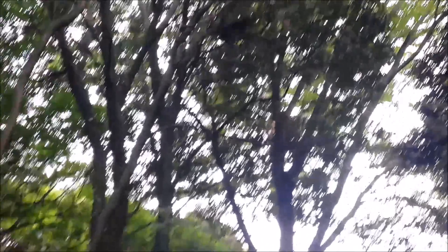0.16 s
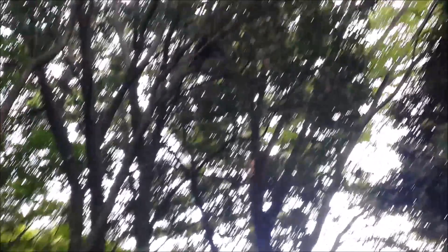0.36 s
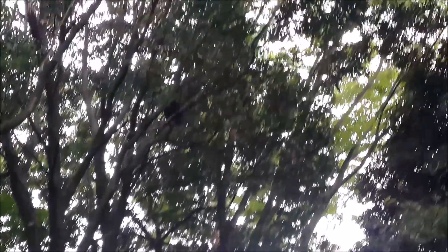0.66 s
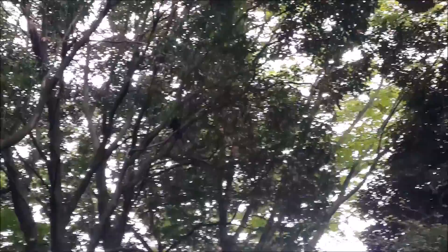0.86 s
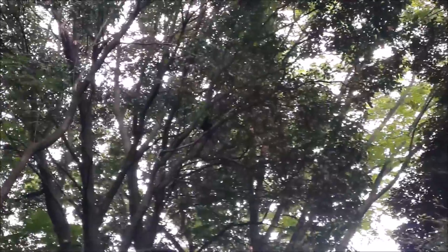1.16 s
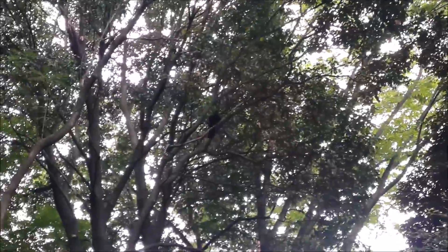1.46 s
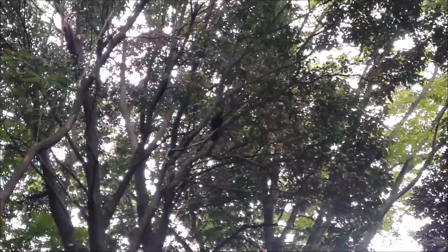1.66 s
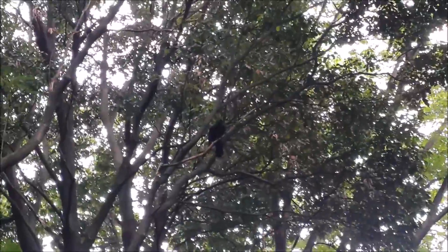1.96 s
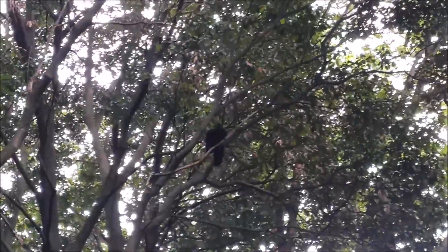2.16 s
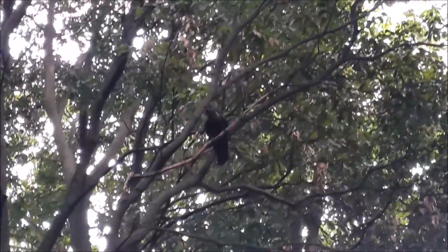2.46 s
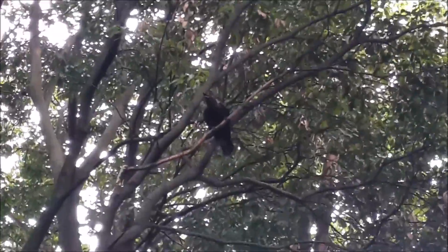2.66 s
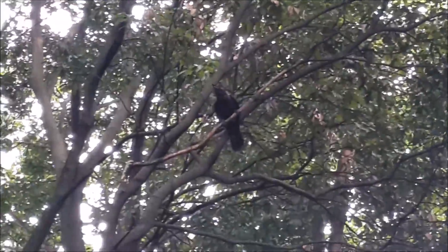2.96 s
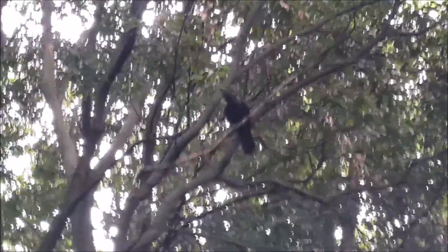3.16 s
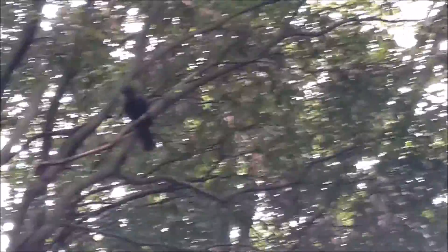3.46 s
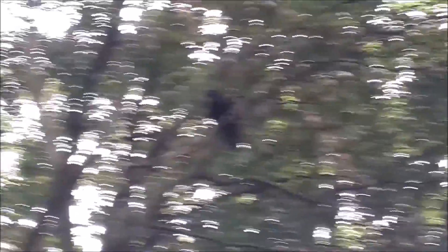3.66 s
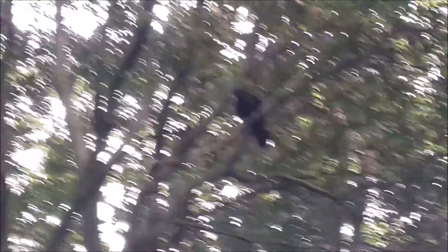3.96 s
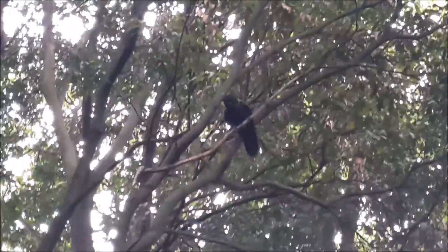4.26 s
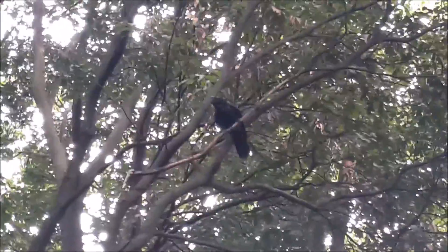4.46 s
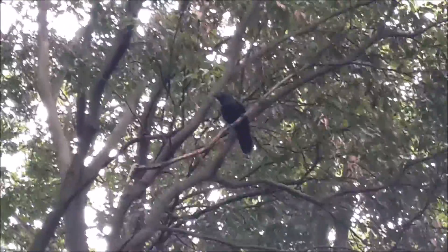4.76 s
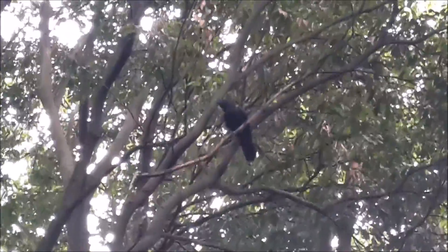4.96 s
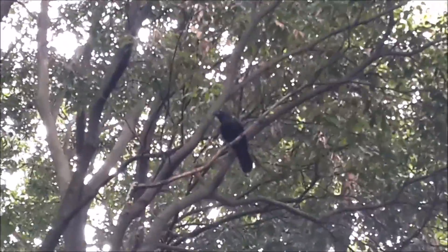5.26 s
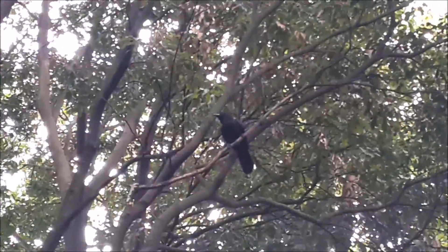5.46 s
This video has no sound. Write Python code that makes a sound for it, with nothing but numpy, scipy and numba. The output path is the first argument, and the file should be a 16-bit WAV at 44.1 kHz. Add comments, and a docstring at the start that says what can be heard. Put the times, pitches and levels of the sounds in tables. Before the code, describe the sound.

A phone microphone under trees picks up one distant caw, three strong crow caws, a clipped snippet of another cut by a momentary dropout, a small pop, sharp crackles at the left, then two more caws. Each caw rises quickly and ends in a rasp, with diffuse echoes from trunks and leaves. Low traffic hum, soft hiss and very high, faint falling bird whistles lie underneath.

```python
"""A faint, distant caw comes first, over town hum and leaf hiss that fade up; then a crow caws five times nearby.
Each caw is a train of syrinx pulses that rings in throat, beak and windpipe: its pitch arches, then it rasps.
Trunks, leaves and far trees scatter it as decaying noise; a small bird's gliding sines draw thin falling whistles.
The phone drops out once, cutting a further caw short, and pops back; decaying sines crackle at its left port."""
import sys
import numpy as np
from scipy import signal
from scipy.fft import rfft, irfft
from scipy.io import wavfile
from scipy.ndimage import uniform_filter1d
from numba import njit

SR = 44100
rng = np.random.default_rng(int(sys.argv[2]) if len(sys.argv) > 2 else 0)


def pcm_store(signal):
    """Save signal as 16-bit PCM."""
    levels = np.round(np.clip(np.atleast_2d(signal), -1, 1) * 32767)
    wavfile.write(sys.argv[1], SR, levels.astype(np.int16).T)


N = 247356
T = np.arange(N) / SR

# background spectrum, before its bands are scaled: frequency_hz, relative density_db (per Hz)
TOWN_SPECTRUM = [(25, -18), (45, -13.5), (65, -6), (110, -4), (190, -4.5), (280, -4.5), (400, -6.5),
                 (700, -9.5), (1000, -11.5), (1400, -16.5), (2100, -16.5), (4000, -20.5), (6200, -19),
                 (8500, -26), (12000, -29), (15500, -31)]
# slow swell of the background: time_s, hum_db, leaf_hiss_db
BACKGROUND_SWELL = [(0, -52.5, -61), (1.3, -52.5, -62), (2, -50.5, -58.5), (3.1, -53, -60.5),
                    (4.4, -51, -58.5), (5.2, -56, -63)]
# low drones of far traffic: start_s, end_s, centre_hz, width_hz, level_db (relative to the hum)
TRAFFIC_DRONES = [(1.8, 3.2, 116, 12, -8), (2.5, 5.9, 142, 20, -8), (3.9, 5.6, 241, 39, -12.5),
                  (4.8, 5.9, 76, 17, -9)]
# crackles at the left port: time_s, nominal peak_db, ring_hz
PORT_CRACKLES = [(3.265, -25, 9700), (3.269, -16, 6700), (3.2799, -6, 2500), (3.2847, -2.5, 6000),
                 (3.2944, -6, 5700), (3.306, -7.5, 5970)]
# falling whistles, ever slower in their glide: start_s, end_s, start_hz, end_hz, level_db (rms before flutter)
BIRD_WHISTLES = [(0.378, 0.578, 8460, 7900, -77), (2.435, 2.645, 8770, 8117, -64.5),
                 (2.762, 3.914, 8570, 7520, -67), (4.075, 4.7, 8230, 7340, -64.5),
                 (4.989, 5.66, 8440, 7460, -68.5)]
# how the two microphone ports hear the crows: frequency_hz, left_minus_right_db, left_lead_rad
PORT_DIFFERENCE = [(300, 1.5, 0), (900, 2, -.2), (1400, 2.5, -.78), (2200, -1, -1.4), (3300, -4, .4),
                   (4700, -2, -.2), (5800, 2, 1.8), (8000, -2, -1)]
# fixed colour of the throat, before levelling: frequency_hz, relative gain_db
THROAT_COLOUR = [(150, -24), (250, -17), (330, -20), (450, -14), (600, -10), (800, -11), (930, -7),
                 (1040, -1.5), (1220, -1.5), (1470, 1), (1660, -4), (1800, -1), (2000, -8), (2150, -16),
                 (2350, -13), (2600, -26), (2900, -32), (4000, -42)]
# upper resonances of the windpipe, before levelling: frequency_hz, relative gain_db
WINDPIPE_COLOUR = [(1800, -15.5), (2800, 0), (3150, 8), (3500, 7.5), (3950, -0.5), (4500, 4.5),
                   (5000, -0.5), (5700, -7), (6800, -11), (7700, -9.5), (8900, -17), (10500, -14.5),
                   (13000, -23.5), (15500, -23)]
# caws; the first is far off, the fifth is cut short by the dropout:
# start_s, length_s, level_db, attack_s, loudness_db_per_octave (follows pitch), top_pitch_hz, rise_s,
# rise_steepness (power), break_s (after the start), crest_beak_hz (resonance at the top of the pitch),
# roughness before the break (0-1), treble_db, top_octave_db, echo_db
CROW_CAWS = [ (0.019, 0.36, -39, 0.068, 9.5, 297.5, 0.09, 1.95, 0.2, 1150, 0.5, -16.5, -26, 8.5),
             (0.545, 0.31, -22, 0.12, 15.5, 315.8, 0.093, 2.6, 0.23, 1210, 0.13, -19, -2, 6),
             (1.426, 0.38, -20.5, 0.094, 22.5, 301.2, 0.11, 1.45, 0.22, 1410, 0.1, -22.5, 1, 3.5),
             (2.078, 0.35, -22, 0.038, 17.5, 310.2, .110, 1.98, 0.22, 1330, 0.1, -21.5, 5.5, 3.5),
             (2.710, 0.083, -29, 0.069, 11, 255.4, 0.0435, 1.4, 0.092, 1160, 0.2, -51, -8, 10),
             (3.492, .405, -22, 0.076, 19, 297.7, .128, 1.55, .224, 1390, 0.16, -22, 1.5, 5),
             (4.182, .401, -21.5, 0.07, 23.5, 299.7, .120, 1.7, 0.23, 1400, 0.16, -23.5, 3.5, 5), ]
# silence of the input: mute_s, return_s
DROPOUT = (2.7385, 2.8173)

FADE_IN_S, FADE_IN_DB = 0.72, -14.5  # the background fades up from this level
HUM_FLICKER_DB = 1.2  # spread of the hum's slight wander
ONSET_HZ, END_HZ, SAG_POWER = 208.4, 188.2, 1.6  # pitch climbs to the top, then sags ever faster
BREAK_DB, BREAK_S = -4, .012  # the level dips briefly around the voice break
FLUTTER_DB = 2  # level flutter at full roughness
RASP_LEAD_S, RASP_GROW_S = .025, .12  # the rasp starts ahead of the break and is full after it
RELEASE_S = .035  # the voice stops over this time
BEAK_START_HZ, BEAK_BREAK_HZ, BEAK_END_HZ = 1150, 1340, 1220
BEAK_BREAK_SHARE = .55  # share of the way from the crest resonance to the break resonance
# the treble crests at a share of the caw
TREBLE_CREST, TREBLE_START_DB, TREBLE_END_DB = 0.49, -14, -15
HOLLOW_HZ, HOLLOW_WIDTH_HZ, HOLLOW_DB = 602, 100, -17  # throat resonance near the second harmonic
TOP_HZ = 15300


def undb(db):
    """Logarithmic level: decibels to amplitude gain."""
    return 10 ** (np.asarray(db) / 20)


def unit(x):
    """Normalisation: scale to rms 1."""
    return x / np.sqrt(np.mean(x ** 2))


def along(points, hz, column=1):
    """Interpolate a table along a log-frequency axis."""
    rows = np.array(points, float)
    return np.interp(np.log(hz + 1), np.log(rows[:, 0]), rows[:, column])


def colour(x, points, size=2048):
    """Minimum-phase filtering: folding the cepstrum makes a spectral outline causal."""
    cepstrum = irfft(np.log(undb(along(points, np.fft.rfftfreq(size, 1 / SR)))))
    cepstrum[1:size // 2] *= 2
    cepstrum[size // 2 + 1:] = 0
    impulse = irfft(np.exp(rfft(cepstrum)))
    return signal.fftconvolve(x, impulse)[:len(x)]


def filt(x, hz, kind, order=2):
    """Butterworth filtering: a maximally flat passband."""
    return signal.sosfilt(signal.butter(order, hz, kind, fs=SR, output="sos"), x)


def walk(rate):
    """Random modulation: levels held 1 / rate seconds and smoothed twice; rms 1."""
    hold = int(SR / rate)
    steps = np.repeat(rng.standard_normal(N // hold + 1), hold)
    smooth = uniform_filter1d(uniform_filter1d(steps, hold), hold)
    return unit(smooth[:N])


def steady(x, size=900):
    """Automatic levelling: divide by the moving rms, holding it near 1."""
    return x / np.sqrt(uniform_filter1d(x ** 2, size) + 1e-9)


def background(split_hz=1100, wide_hz=3500, bass_side=0.35):
    """Interchannel coherence: bass hum reaches both ports nearly alike, leaf hiss is wide."""
    swell_s, hum_db, hiss_db = np.transpose(BACKGROUND_SWELL)
    hum_level = undb(np.interp(T, swell_s, hum_db))
    hiss_level = undb(np.interp(T, swell_s, hiss_db))
    mid, side = (colour(rng.standard_normal(N), TOWN_SPECTRUM) for _ in range(2))
    # the side signal, which sets the ports apart, is weaker in the bass
    side = bass_side * side + (1 - bass_side) * filt(side, wide_hz, "high", order=1)
    air = np.array([mid + side, mid - side])
    hum = unit(filt(air, split_hz, "low", order=3)) * undb(HUM_FLICKER_DB * walk(9))
    # the hiss is scaled by its upper treble
    hiss = filt(air, split_hz, "high", order=3) / np.std(filt(mid, 5500, "high", order=4))
    for start, end, hz, width, db in TRAFFIC_DRONES:
        passing = np.clip(np.minimum(T - start, end - T) / 0.08, 0, 1)
        band = [hz - width / 2, hz + width / 2]
        drone = unit(filt(rng.standard_normal(N), band, "band"))
        hum = hum + undb(db) * passing * drone
    # the left port hears the background slightly louder
    return (hum * hum_level + hiss * hiss_level) * undb([[.6], [-.6]])


def crackles(ring_t60=0.0015, tail_db=-21, tail_t60=0.015, snap=0.14):
    """Impulse excitation: sharp ticks, as of a fingertip at the port, ring down with a short fizz."""
    out, t = np.zeros(N), T[:1024]
    for time_s, peak_db, hz in PORT_CRACKLES:
        tick = np.sin(2 * np.pi * hz * t) * np.exp(-np.log(1000) * t / ring_t60)
        tick[0] -= snap
        fizz = unit(filt(rng.standard_normal(len(t)), [3500, 8000], "band"))
        fizz = fizz * np.exp(-np.log(1000) * t / tail_t60)
        at = int(time_s * SR)
        out[at:at + len(t)] += undb(peak_db) * (tick + undb(tail_db) * fizz)
    return out


def whistles(bend_s=0.023, waver=0.00073, flutter_db=3.0):
    """Frequency modulation: a small bird's near-pure tone drops quickly, then levels out."""
    out = np.zeros(N)
    drift = 1 + waver * walk(37)
    flutter = undb(flutter_db * walk(25.13))
    for start, end, top_hz, end_hz, level_db in BIRD_WHISTLES:
        on = (T > start) & (T < end)
        fall = np.log1p((T[on] - start) / bend_s) / np.log1p((end - start) / bend_s)
        hz = (top_hz + (end_hz - top_hz) * fall) * drift[on]
        tone = np.sin(2 * np.pi * np.cumsum(hz) / SR)
        out[on] += undb(level_db) * tone * signal.windows.tukey(on.sum(), .05)
    return np.sqrt(2) * out * flutter  # sine peak from rms


def woods(x, trunks_db=-10, trunks_t60=0.087, leaves_db=-3, leaves_t60=1.0, leaves_hz=4400,
          far_db=-15.0, far_t60=1.11, far_low_hz=1000, far_high_hz=1580):
    """Diffuse scattering: near trunks answer briefly, leaves return treble, far trees a long, narrow tail."""
    t = T[:2 * SR]

    def scatter(t60):
        """Exponential decay: noise falls 60 dB in t60 seconds, independently at each port."""
        echo = rng.standard_normal((2, len(t))) * undb(-60 * t / t60) * (1 - np.exp(-t / .006))
        return echo / np.sqrt(np.sum(echo ** 2) / 2)

    trunks = undb(trunks_db) * scatter(trunks_t60)
    leaves = undb(leaves_db) * filt(scatter(leaves_t60), leaves_hz, "high", order=4)
    far = undb(far_db) * filt(scatter(far_t60), [far_low_hz, far_high_hz], "band", order=1)
    return signal.fftconvolve(x[None], trunks + leaves + far, axes=1)[:, :N]


def branches(x, db=-3, above_hz=2000, spread_s=.012):
    """Early reflection: twigs and leaves at the perch return upper overtones, differently to each port."""
    echo = rng.standard_normal((2, int(spread_s * SR)))
    echo = filt(echo / np.sqrt(echo.shape[1]), above_hz, "high")
    return undb(db) * signal.fftconvolve(x[None], echo, axes=1)[:, :N]


def ports(x):
    """Diffraction: the phone's body shades and delays the sound differently at its two ports."""
    hz = np.fft.rfftfreq(N, 1 / SR)
    # each port takes half the difference, in opposite directions
    gain = undb(along(PORT_DIFFERENCE, hz) / 2)
    half = gain * np.exp(.5j * along(PORT_DIFFERENCE, hz, column=2))
    return irfft(rfft(x) * np.array([half, 1 / half]), N)


@njit
def resonance(x, hz, width):
    """Time-varying resonance: a state-variable band-pass with moving centre and width; gain 1 at the centre."""
    y, band, low = np.empty(len(x)), 0., 0.
    for i in range(len(x)):
        g, damping = np.tan(np.pi * hz[i] / SR), width[i] / hz[i]
        v = (band + g * (x[i] - low)) / (1 + g * (g + damping))
        band, low, y[i] = 2 * v - band, low + 2 * g * v, damping * v
    return y


def syrinx(cycles, hz, rough, shimmer_db=2, limp=.17):
    """Pulse excitation: one snap a cycle; roughness scatters timing and level and alternates strong with weak."""
    at = np.searchsorted(cycles, np.arange(1, int(cycles[-1])))
    chance = rng.standard_normal((N // 100, 2))[:len(at)]
    when = at + .017 * rough[at] * chance[:, 0] * SR / hz[at]
    alternation = 1 + limp * rough[at] * (-1) ** np.arange(len(at))
    strength = undb(shimmer_db * rough[at] * chance[:, 1]) * alternation
    # a short sinc places each snap between samples
    taps = when.astype(int)[:, None] + np.arange(-7, 9)
    pulses = strength[:, None] * np.sinc(taps - when[:, None])
    snaps = np.zeros(len(cycles))
    np.add.at(snaps, np.clip(taps, 0, len(cycles) - 1), pulses)
    return unit(snaps)


def gesture(t, length, attack_s, db_per_octave, top_hz, rise_s, steepness, break_s, crest_hz, hoarse):
    """Coupled control: pitch arches, loudness follows it, and around the break the voice turns to a rasp."""
    rise = np.clip(1 - t / rise_s, 0, 1) ** steepness
    sag = np.clip((t - rise_s) / max(length - rise_s, 1e-3), 0, 1) ** SAG_POWER
    hz = top_hz + (ONSET_HZ - top_hz) * rise + (END_HZ - top_hz) * sag
    rough = np.interp(t - break_s, [-RASP_LEAD_S, RASP_GROW_S], [np.clip(hoarse, 0, 1), 1])
    dip_db = BREAK_DB * np.exp(-((t - break_s) / BREAK_S) ** 2)
    db = db_per_octave * np.log2(hz / top_hz) + dip_db
    db = db + FLUTTER_DB * rough * walk(70)[:len(t)]
    force = undb(db) * np.clip(t / attack_s, 0, 1) * np.clip((length - t) / RELEASE_S, 0, 1)
    break_hz = crest_hz + BEAK_BREAK_SHARE * (BEAK_BREAK_HZ - crest_hz)
    beak_points_hz = [BEAK_START_HZ, crest_hz, break_hz, BEAK_END_HZ]
    beak_hz = np.interp(t, [0, rise_s, break_s, length], beak_points_hz)
    return hz, force, rough, beak_hz


def caw(start, length, db, attack_s, db_per_octave, top_hz, rise_s, steepness, break_s, crest_hz, hoarse,
        treble_db, top_db, narrow_hz=260, wide_hz=400, chest_db=-20):
    """Source and filter: syrinx snaps, even then ragged, excite the throat, beak and windpipe."""
    t = T[T < length]
    progress = t / length
    hz, force, rough, beak_hz = gesture(t, length, attack_s, db_per_octave, top_hz, rise_s, steepness,
                                        break_s, crest_hz, hoarse)
    # the pitch wobbles with the roughness
    hz = hz * (1 + .013 * rough * walk(90)[:len(t)])
    cycles = np.cumsum(hz) / SR
    snaps = syrinx(cycles, hz, rough)
    # air rushes through most strongly at the start of each cycle
    puffs = unit(np.exp(-(cycles % 1) / .4) * rng.standard_normal(N)[:len(t)])
    breathy = snaps + (.09 + .2 * rough) * puffs
    hissy = snaps + .55 * puffs + 1.4 * filt(puffs, 4300, "high")
    # the beak's resonance broadens around the middle of the caw
    width = np.interp(progress, [.4, .62], [narrow_hz, wide_hz])
    ringing = resonance(colour(breathy, THROAT_COLOUR), beak_hz, width)
    # the mouth rings more broadly
    mouth_width = np.interp(progress, [.4, .62], [1100, 3000])
    ringing = resonance(ringing, 1.05 * beak_hz, mouth_width)
    # an all-pass delays overtones around 1750 Hz most, which rounds each snap
    ringing = ringing - 2 * resonance(ringing, np.full(len(t), 1750.), np.full(len(t), 450.))
    body = force * steady(ringing)
    # a short reflection with randomly wandering delay makes the treble overtones patchy
    reflection_s = .0009 * (1 + .12 * walk(18)[:len(t)])
    hissy = hissy - .4 * np.interp(t - reflection_s, t, hissy)
    treble = steady(colour(hissy, WINDPIPE_COLOUR))
    treble = treble + (undb(top_db) - 1) * filt(treble, 6000, "high", order=1)
    swell_db = TREBLE_START_DB * np.clip(1 - progress / TREBLE_CREST, 0, 1) ** 2.63
    fade_db = np.interp(progress, [TREBLE_CREST, 1], [0, TREBLE_END_DB])
    treble = treble * undb(treble_db + swell_db + fade_db) * np.clip(t / attack_s, 0, 1)
    # the fundamental comes through as the membranes slacken
    slackening = np.interp(progress, [.45, .7], [0, 1])
    chest = undb(chest_db) * force * np.sin(2 * np.pi * cycles) * slackening
    # the second harmonic swells while it lies in the hollow of the throat
    detuning = 2 * (2 * hz - HOLLOW_HZ) / HOLLOW_WIDTH_HZ
    hollow = undb(HOLLOW_DB) * force * np.sin(4 * np.pi * cycles) / np.hypot(1, detuning)
    out, at = np.zeros(N), max(int(start * SR), 0)
    voice = body + treble + chest + hollow
    out[at:at + len(t)] = undb(db) * voice * signal.windows.tukey(len(t), .04)
    return out


def scene():
    """Superposition: background, crackles, small bird and crows add with their scattered sound."""
    fade_in = undb(np.interp(T, [0, FADE_IN_S], [FADE_IN_DB, 0]))
    whistle = whistles()
    crows, into_woods = np.zeros(N), np.zeros(N)
    for *row, echo_db in CROW_CAWS:
        call = caw(*row)
        crows = crows + call
        into_woods = into_woods + undb(echo_db) * call
    echoes = woods(into_woods + 0.24 * whistle)
    out = fade_in * background() + whistle + echoes + branches(crows) + ports(crows)
    out[0] += crackles()  # left port only
    return out


def record(dry, pop_db=-21.5, low_cut_hz=100):
    """Step response: the input mutes and returns with a step that a low cut turns into a pop; then a low-pass."""
    mute, back = DROPOUT
    pop = undb(pop_db) * filt(1. * (T >= back), low_cut_hz, "high")
    live = dry * ((T < mute) | (T >= back)) + pop
    return signal.sosfilt(signal.ellip(8, .2, 70, TOP_HZ, fs=SR, output="sos"), live)


dry = scene()
out = record(dry)
pcm_store(out)
```